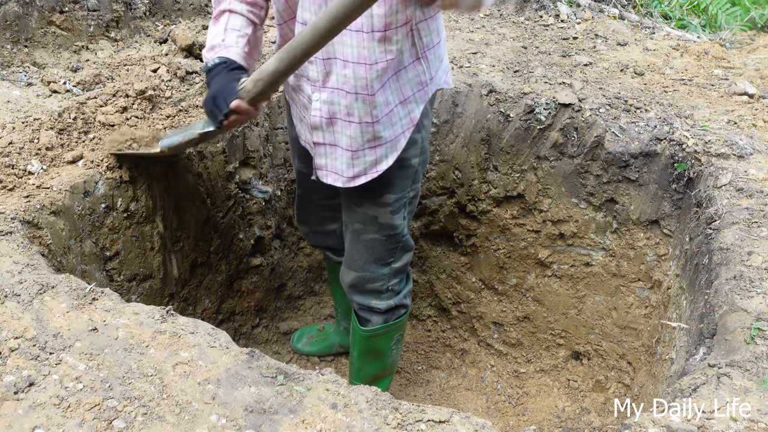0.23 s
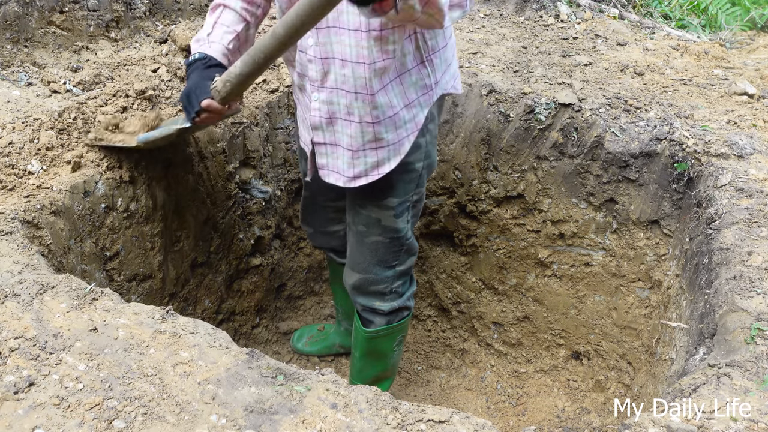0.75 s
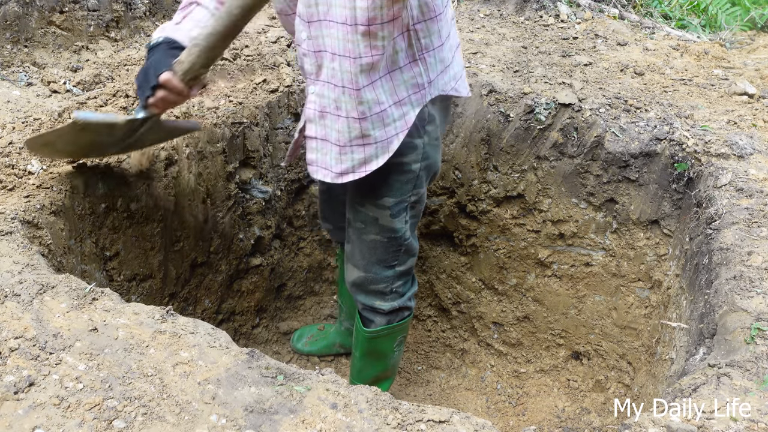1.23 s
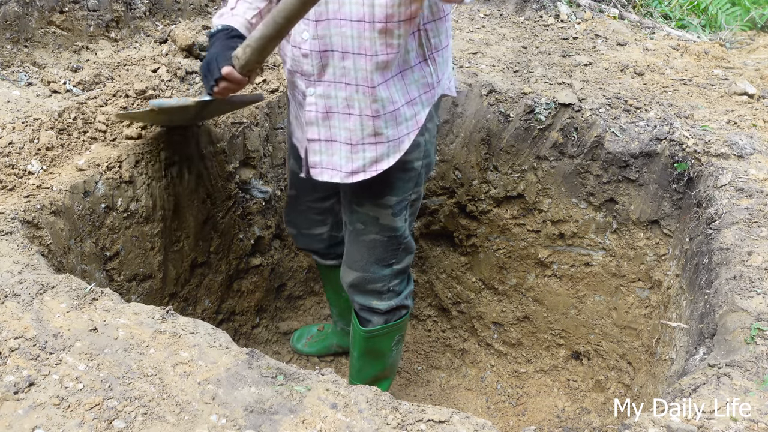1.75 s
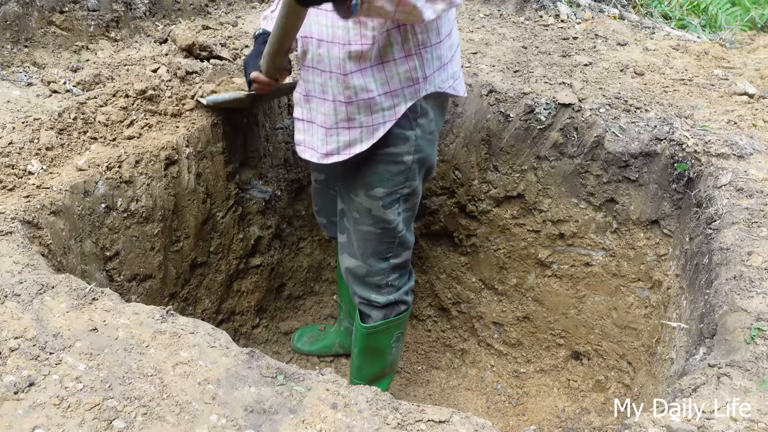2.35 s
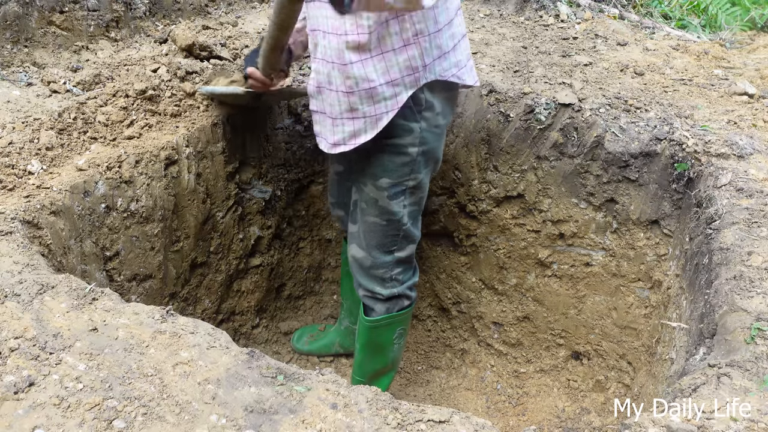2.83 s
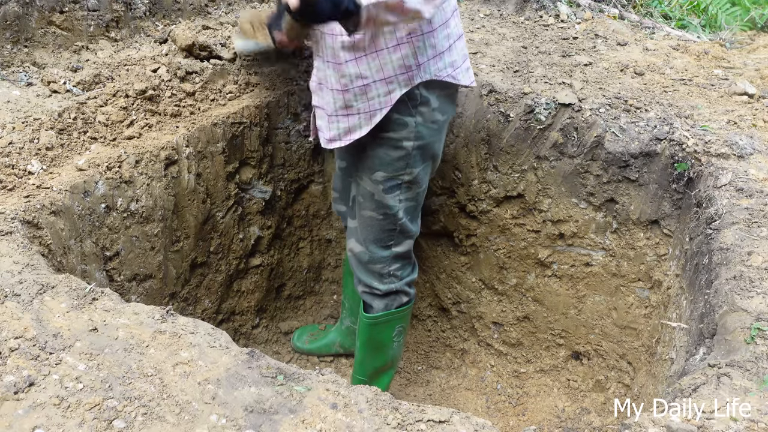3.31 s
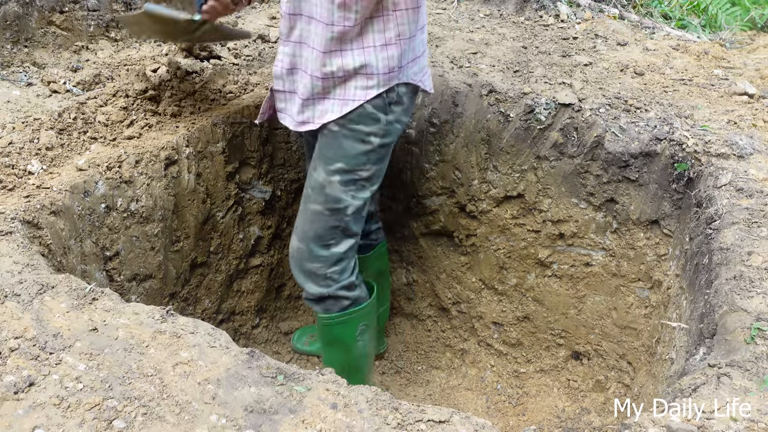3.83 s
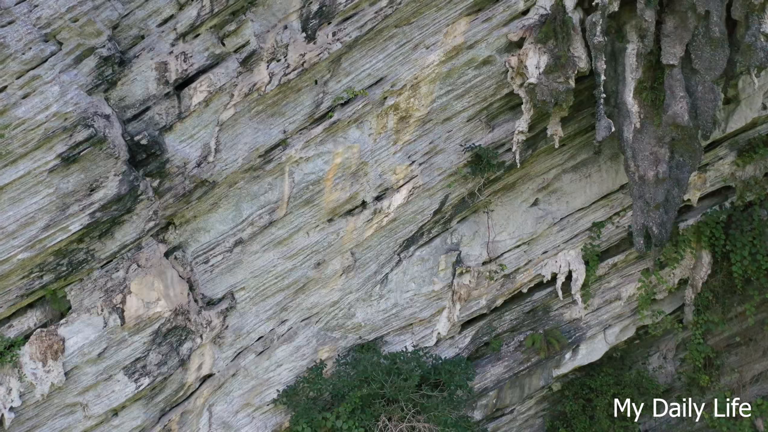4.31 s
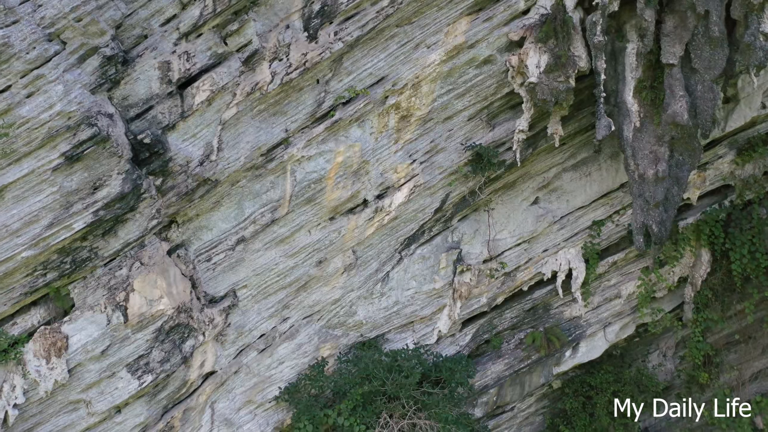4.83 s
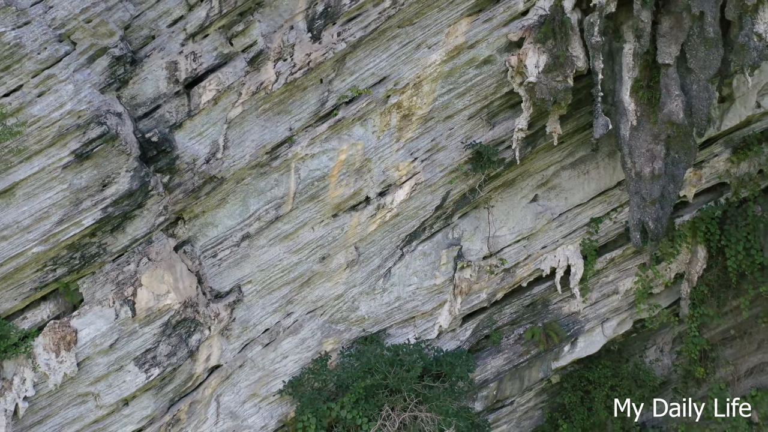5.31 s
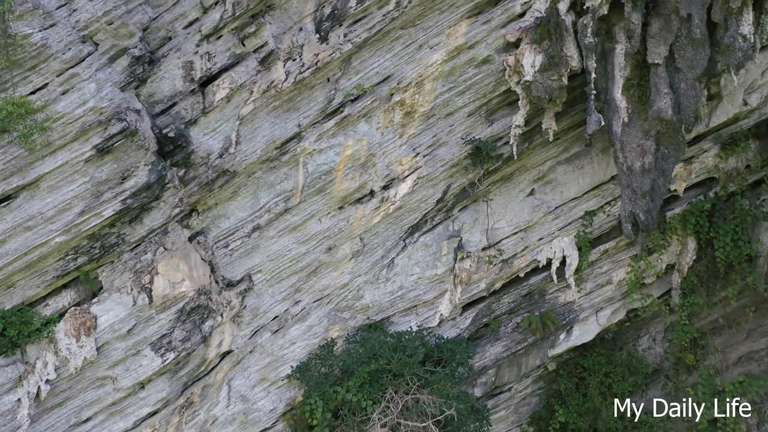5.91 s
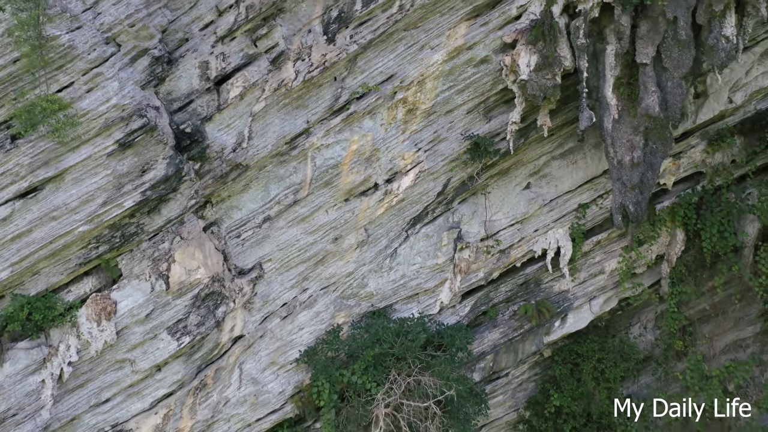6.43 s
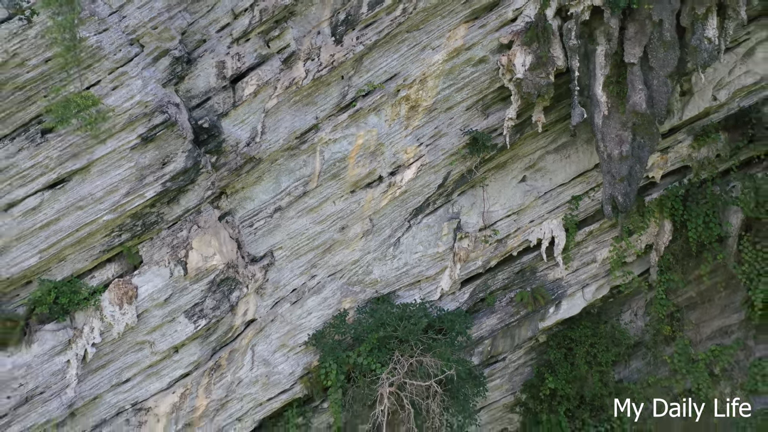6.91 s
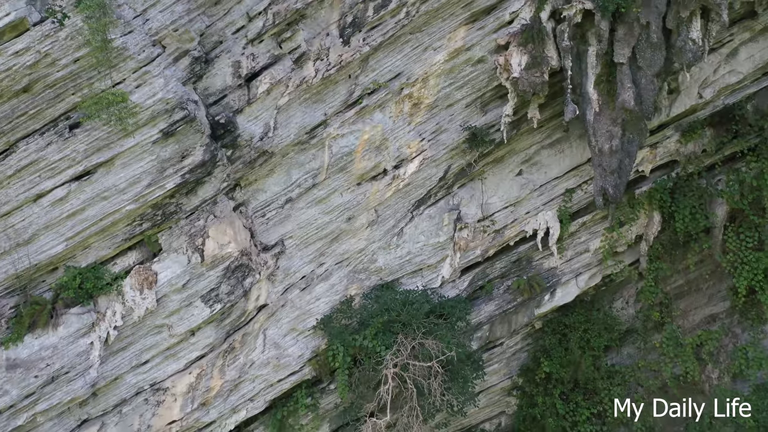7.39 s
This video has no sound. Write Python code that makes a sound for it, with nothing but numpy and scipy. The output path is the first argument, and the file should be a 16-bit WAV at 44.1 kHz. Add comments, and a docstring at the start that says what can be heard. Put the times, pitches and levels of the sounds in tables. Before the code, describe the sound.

Crunchy shovel strokes shave a clay pit under a high cicada buzz; suddenly the digging gives way to layered insect trills and distant bird chirps.

```python
"""First a steel shovel shaves the wall of a clay pit in five strokes, while cicadas drone all around:
random cracks of grit sound directly and ring the blade, filtered noise bursts make thuds and falling clods.
At about 4 s the scene changes abruptly to the foot of a wooded cliff. Several insects pulse there, each with
its own pitch and rate, made of short gliding tones. A far bird gives falling whistles, then rising chirps,
and just before the end the nearest cicada stops."""
import sys
import numpy as np
from scipy import signal
from scipy.fft import rfft, irfft
from scipy.io import wavfile

SR = 44100
rng = np.random.default_rng(int(sys.argv[2]) if len(sys.argv) > 2 else 0)


def wav_out(sig):
    """Save sig, one row per channel (or a flat mono array), as 16-bit PCM at SR to the path in sys.argv[1]."""
    wavfile.write(sys.argv[1], SR, np.round(np.clip(np.atleast_2d(sig).T, -1, 1) * 32767).astype(np.int16))


N = 337806
T = np.arange(N) / SR   # time [s]


def from_db(db):
    """Turns decibels into a gain."""
    return 10 ** (np.asarray(db) / 20)


def rms_one(x):
    """Scales a sound to a power of one."""
    return x / np.sqrt(np.mean(x ** 2) + 1e-20)


def drift(rate):
    """Random wandering: straight lines between chance values of spread 1, `rate` of them a second."""
    knots = rng.standard_normal(20000)
    return np.interp(T * rate, np.arange(len(knots)), knots)


def pan(left_db):
    """Gains for left and right; left is louder by left_db."""
    return from_db([[left_db / 2], [-left_db / 2]])


def band(x, low_hz, high_hz, order=2):
    """Lets one band of pitches through; white noise keeps about its power."""
    sos = signal.butter(order, [low_hz, high_hz], "band", fs=SR, output="sos")
    return signal.sosfilt(sos, x) * np.sqrt(SR / 2 / (high_hz - low_hz))


def colour(x, spectrum, size=4096):
    """Filters to a given spectrum without sounding early (minimum phase); white noise keeps its power."""
    hz, db = np.transpose(spectrum)
    bin_hz = np.fft.rfftfreq(size, 1 / SR)
    gain = rms_one(from_db(np.interp(np.log(bin_hz + 1), np.log(hz), db)))
    # folding the cepstrum forward in time gives the minimum-phase response
    cepstrum = irfft(np.log(gain))
    cepstrum[1:size // 2] *= 2
    cepstrum[size // 2 + 1:] = 0
    response = irfft(np.exp(rfft(cepstrum)))
    return signal.oaconvolve(np.atleast_2d(x), response[None], axes=1)[:, :N]


def stereo_noise(side_db):
    """White noise in two channels; the higher side_db, the more they differ."""
    mid, side = rng.standard_normal((2, N))
    return rms_one(mid + from_db(side_db) * side * [[1], [-1]])


def scatter(x, t60, wet_db, side_db):
    """Adds a dense dying echo from earth, rock or trees; it falls 60 dB in t60 seconds."""
    age = T[:SR // 2]
    tail = stereo_noise(side_db)[:, :len(age)] * from_db(-60 * age / t60)
    tail *= age > .002   # the echo starts after 2 ms
    tail /= np.sqrt(np.sum(tail ** 2) / 2)
    both_channels = np.atleast_2d(x) * np.ones((2, 1))
    return x + from_db(wet_db) * signal.oaconvolve(both_channels, tail, axes=1)[:, :N]


def grains(per_s, spread_db):
    """Random tiny cracks of very uneven size, with a power of one."""
    sizes = from_db(spread_db * np.minimum(rng.exponential(1, N), 4)) * rng.choice([-1, 1], N)
    return rms_one(sizes * (rng.random(N) < per_s / SR))


def dying(start, decay, rise):
    """Loudness curve of one blow: a quick rise, then a slower decay."""
    age = np.maximum(T - start, 0)
    return (1 - np.exp(-age / rise)) * np.exp(-np.minimum(age / decay, 40))


def held(start, length, attack, release):
    """Loudness curve that swells up to its start, holds and dies away."""
    before = np.maximum(start - T, 0) / attack
    after = np.maximum(T - start - length, 0) / release
    return np.exp(-np.minimum(before + after, 40))


def chirps(cycles, hz, duty, sweep_hz, arch_hz, rough_hz):
    """One whistled pulse a cycle, centred on whole cycles; its pitch slides, arches and roughens."""
    place = np.clip(((cycles + .5) % 1 - .5) / duty, -.5, .5)   # -0.5 to 0.5 along the pulse
    pitch = hz + sweep_hz * place - arch_hz * (2 * place) ** 2 + rough_hz * drift(1500)
    return np.sqrt(2) * np.cos(np.pi * place) * np.sin(2 * np.pi * np.cumsum(pitch) / SR)


def whistles(calls, length, from_hz, to_hz, waver_hz):
    """One gliding, wavering note, repeated at each call."""
    song, waver = np.zeros(N), waver_hz * drift(500)
    for start, db in calls:
        done = np.clip((T - start) / length, 0, 1)
        pitch = from_hz + (to_hz - from_hz) * done + waver
        song += from_db(db) * np.sin(np.pi * done) * np.sin(2 * np.pi * np.cumsum(pitch) / SR)
    return song


def open_air(spectrum, side_db, apart_hz, top_side_db):
    """Diffuse background noise; the two channels grow more alike toward the treble."""
    mid, side = rng.standard_normal((2, N))
    low_side = signal.sosfilt(signal.butter(1, apart_hz, fs=SR, output="sos"), side)
    difference = from_db(side_db) * low_side + from_db(top_side_db) * side
    return colour(mid + difference * [[1], [-1]], spectrum)


def chorus(rows, side_db, flutter_db):
    """Many far insects merge into fluttering bands of noise."""
    out = np.zeros((2, N))
    for hz, width, db in rows:
        noise = band(stereo_noise(side_db), hz - width / 2, hz + width / 2, order=3)
        out += from_db(db + flutter_db * drift(120)) * noise
    return out


# spectrum of the air at the cliff: (frequency [Hz], relative level per Hz [dB])
CLIFF_AIR = [(25, -39), (55, -35), (110, -5), (220, 1), (550, -0.5), (900, -6.5), (1900, -4), (2700, -9),
             (5000, -8), (9500, -3), (11500, -15.5), (15500, -15)]
# far insects at the cliff, too many to tell apart: (centre [Hz], width [Hz], level [dB])
CLIFF_CHORUS = [(4160, 710, -63), (4930, 850, -60), (5460, 570, -56), (7020, 680, -51), (7590, 400, -53),
                (9020, 780, -65)]


def cliff_surroundings(air_db=-56.5):
    """Soft noise of the air under a far insect chorus, both shaped from random noise."""
    air = from_db(air_db) * open_air(CLIFF_AIR, side_db=-7.0, apart_hz=1800, top_side_db=-17.0)
    return air * pan(1.1) + chorus(CLIFF_CHORUS, side_db=-7.5, flutter_db=2.0)


# spectrum of the hiss round the pit: (frequency [Hz], relative level per Hz [dB])
PIT_AIR = [(25, -32), (55, -30), (110, -10), (260, -8), (900, -13), (1800, -7), (2300, -3), (3900, 1.5),
           (5300, 2), (6400, -0.5), (9200, -7.5), (12000, -17), (15500, -15)]
# far cicadas round the pit, before panning: (centre [Hz], width [Hz], level [dB])
PIT_CHORUS = [(7325, 730, -39), (8000, 620, -45.5)]
PIT_HISS_DB, PIT_FADE_DB_PER_S = -38.5, 0.64   # the broad hiss slowly sinks


def pit_surroundings(buzz_db=-40.0, upper_db=-42.0):
    """Cicadas buzz in fast falling pulses over their far chorus and a broad hiss."""
    air = open_air(PIT_AIR, side_db=-13.5, apart_hz=1160, top_side_db=-9.0)
    air *= from_db(PIT_HISS_DB - PIT_FADE_DB_PER_S * T)
    # about 61 and 53 pulses a second, slightly uneven
    buzz = from_db(buzz_db) * chirps(
        61 * T + 0.26 * drift(12), hz=7280, duty=0.63, sweep_hz=-400, arch_hz=101.4, rough_hz=150)
    upper = from_db(upper_db) * chirps(
        53 * T + 0.17 * drift(6.5), hz=8444, duty=.65, sweep_hz=-600, arch_hz=103.7, rough_hz=71.6)
    near = scatter(buzz + upper, t60=0.17, wet_db=-3.5, side_db=-6.0)
    far = chorus(PIT_CHORUS, side_db=-8.5, flutter_db=1.0)
    return air + (near + far) * pan(-5.5)


# thin fluttering tones in the hiss round the pit: (start [s], end [s], pitch [Hz], level [dB])
THIN_TONES = [(0.0, 1.5, 3648, -50), (0.9, 1.2, 5525, -50), (2.2, 3.75, 5015, -51), (2.2, 2.75, 5285, -49),
              (1.8, 4.1, 2875, -57), (2.6, 4.1, 3885, -56)]


def thin_tones():
    """Narrow, fluttering tones, each made from a sliver of noise."""
    out = np.zeros(N)
    width_hz, fade_s = 22, .12
    for start, end, hz, db in THIN_TONES:
        fade = np.clip(np.minimum(T - start, end - T) / fade_s, 0, 1)
        tone = band(rng.standard_normal(N), hz - width_hz / 2, hz + width_hz / 2, order=1)
        out += fade * from_db(db) * tone
    return out


# far bird, falling whistles: (time [s], level [dB])
FALLING_CALLS = [(4.056, -55), (5.396, -53), (5.575, -54)]
# far bird, a run of rough rising chirps: (time [s], level [dB])
RISING_CALLS = [(6.37, -56), (6.688, -53), (6.92, -54), (7.135, -53.5), (7.332, -53), (7.529, -53)]


def bird():
    """Short falling whistles, later a run of rough rising chirps, blurred by the cliff's echo."""
    falling = whistles(FALLING_CALLS, length=0.089, from_hz=3400, to_hz=3160, waver_hz=80)
    rising = whistles(RISING_CALLS, length=0.085, from_hz=4530, to_hz=4800, waver_hz=130)
    far_falling = scatter(falling, t60=0.97, wet_db=-0.5, side_db=-9.0)
    return far_falling + scatter(rising, t60=0.5, wet_db=-1.0, side_db=-9.0)


# low rasping insect, two bouts with a short rest: (start [s], end [s], phrases per second once warm [1/s])
RASP_BOUTS = [(3.005, 4.59, 22.32), (4.79, 7.8, 23.03)]
RASP_DB, RASP_HZ = -50, 4190   # once warm, before the accents
# each bout starts this much softer, slower [phrases/s] and lower
WARM_UP_S, COLD_DB, COLD_PER_S, COLD_HZ = .4, 8.5, 10, 199
CRICKET_THROB_HZ, CRICKET_PEAK_S = 7.49, 6.338   # throbs per second, and the time of one peak


def cliff_insects(accent_db=14.5, throb_db=4.0, cricket_peak_db=-50.5, tick_db=-58.5):
    """A rasp in phrases of three pulses, a throbbing cricket trill and a thin high ticking."""
    singing, cold, phrase = np.zeros((3, N))
    for start, end, per_s in RASP_BOUTS:
        bout = (T > start) & (T < end)
        singing += bout
        cold += bout * np.exp(-np.abs(T - start) / WARM_UP_S)
        phrase += bout * np.cumsum(bout * (per_s - COLD_PER_S * cold)) / SR
    accent = accent_db * (np.cos(2 * np.pi * phrase - 1) - 1)   # two strong pulses, then a weak one
    rasp_level = singing * from_db(RASP_DB - COLD_DB * cold + accent)
    rasp = rasp_level * chirps(
        3 * phrase, hz=RASP_HZ - COLD_HZ * cold, duty=0.76, sweep_hz=-480, arch_hz=26, rough_hz=49.7)

    throb = 2 * np.pi * CRICKET_THROB_HZ * (T - CRICKET_PEAK_S)
    trill_hz = 5480 + 110 * np.sin(throb)
    trill = chirps(
        92 * T + 0.753 * drift(15), hz=trill_hz, duty=0.7, sweep_hz=-200, arch_hz=30.0, rough_hz=98)
    cricket = from_db(cricket_peak_db + throb_db * (np.cos(throb) - 1)) * trill

    tick = from_db(tick_db) * chirps(65 * T, hz=9150, duty=0.5, sweep_hz=-500, arch_hz=50, rough_hz=304)
    insects = rasp * pan(16.0) + cricket * pan(4.9) + tick
    return scatter(insects, t60=0.27, wet_db=-5.0, side_db=3.0)


SOLO_DB, SOLO_END_S, SOLO_FADE_S = -40.5, 7.31, .04   # it sings evenly, then stops


def solo_cicada(wander_db=1.5):
    """The nearest cicada: evenly spaced pulses whose pitch rises and falls."""
    cycles = (T - 4.1046) / .044064   # one pulse every 44 ms
    level = from_db(SOLO_DB + wander_db * drift(4)) * np.clip((SOLO_END_S - T) / SOLO_FADE_S, 0, 1)
    song = level * chirps(cycles, hz=7262, duty=.48, sweep_hz=-40, arch_hz=488, rough_hz=46.1)
    return scatter(song, t60=.15, wet_db=-10.0, side_db=-5.0) * pan(-5.5)


# loosened soil trickles down after a stroke: (time of most flow [s], relative level [dB], half length [s])
SPILLS = [(0.518, -35.5, 0.034), (1.074, -41, 0.066), (1.776, -38.5, 0.071), (2.522, -41.5, 0.1)]
# spectra of cracking grit, clay crumbs and fine sand: (frequency [Hz], relative level per Hz [dB])
GRIT = [(200, -37), (700, -18.5), (1400, -7.5), (2200, -0.5), (3200, 5.5), (4500, 2.5), (6500, -1.5),
        (9000, -15), (12000, -21), (16000, -41)]
CRUMBS = [(60, -25), (170, -11.5), (260, -8.5), (380, -9), (700, 0), (1150, 4), (1800, 4), (3000, 2),
          (8000, -26.5)]
SAND = [(3000, -43), (6000, 1), (8500, 6.5), (10500, 3), (13000, -5.5), (16000, -12)]
SPILL_CLAY_DB, SPILL_SAND_DB = -11.5, -8   # crumbs and sand compared with the grit


def spills():
    """Loose grit, crumbs and sand run down the wall, clear of the blade, as showers of tiny cracks."""
    flow = np.zeros(N)
    for s, db, half in SPILLS:
        flow += from_db(db) * np.exp(-np.minimum(((T - s) / half) ** 2 / 2, 40))
    fall = flow * grains(6000, 2.4)
    sand = flow * grains(8000, 2.2)
    crumbs = from_db(SPILL_CLAY_DB) * colour(fall, CRUMBS)
    return colour(fall, GRIT) + crumbs + from_db(SPILL_SAND_DB) * colour(sand, SAND)


# the blade is pushed through the clay, a few shoves to a stroke; also played by shovel():
# (time [s], length [s], relative grit level [dB], relative crumbling level [dB], relative thud level [dB])
SHOVES = [(0.302, 0.023, -22, -50, -29.5), (0.34, 0.038, -27.5, -38, -31.5), (0.395, 0.016, -28, -36, -46),
          (0.738, 0.027, -25, -37, -37.5), (0.789, 0.04, -22, -27.5, -29.5),
          (0.878, 0.018, -24.5, -35.5, -50), (0.937, .004, -42.5, -36, -51),
          (1.369, 0.022, -28, -31, -34.5), (1.435, 0.022, -22.5, -26, -38), (1.482, .02, -22, -34, -38),
          (1.566, 0.051, -20, -26, -33.5), (2.134, 0.0089, -28.5, -50, -53), (2.162, 0.023, -15, -29, -29),
          (2.226, 0.056, -32.5, -49, -52), (2.291, 0.023, -22, -29.5, -32.5),
          (2.361, 0.04, -31, -44.5, -51), (2.695, 0.012, -34, -40, -56), (2.83, 0.047, -29, -34.5, -50),
          (2.929, 0.024, -25.5, -36, -35.5), (2.991, .005, -33, -38, -48), (3.143, 0.038, -29, -38, -50),
          (3.219, 0.0072, -46, -28.5, -47), (3.284, 0.0022, -45, -35.5, -54)]
# clods land and boots shift: (time [s], relative level [dB], decay [s], highest pitch [Hz])
CLODS = [(2.567, -30, 0.0091, 684), (2.644, -37, 0.012, 640), (3.234, -26, .005, 1150),
         (3.851, -53.5, .06, 1000)]
# spectrum of dull blows on soft earth: (frequency [Hz], relative level per Hz [dB])
EARTH = [(25, -27), (52, -49), (72, -2.5), (110, -10.5), (185, -13), (225, 1), (295, 1), (350, -3),
         (650, 1.5), (1500, -1), (4000, -42)]
THUD_DECAY_S, THUD_HZ = 0.02, 348   # decay and highest pitch of a shove's dull blow
THUD_SPAN, CLOD_SPAN = 6.5, 2.36    # highest over lowest pitch of a blow


def thuds(level_db=3.5):
    """Soft earth takes a shove with a deep, broad burst and a clod with a higher, narrower knock."""
    push, blows = rng.standard_normal(N), np.zeros(N)
    shoves = [(s, db, THUD_DECAY_S, THUD_HZ, THUD_SPAN) for s, _, _, _, db in SHOVES]
    clods = [(*row, CLOD_SPAN) for row in CLODS]
    for s, db, decay, hz, span in shoves + clods:
        contact = signal.butter(3, [hz / span, hz], "band", fs=SR, output="sos")
        burst = push * dying(s, decay, rise=0.00043) + 1e-18   # the tiny offset keeps the filter fast
        blows += from_db(db + level_db) * signal.sosfilt(contact, burst)
    return colour(blows, EARTH)


# ringing notes of the steel blade: (pitch [Hz], relative level [dB], time to fall 60 dB if undamped [s])
BLADE = [(907, -6.5, 0.14), (1105, -6.5, 0.12), (1335.5, 1, 0.2), (1437, -2, 0.34), (1760, -1.5, 0.058),
         (1934, -0.5, 0.078), (2134, 4, 0.089), (2240, -1, 0.049), (2606, 2.5, 0.084), (2660, -1, 0.22),
         (3140, 6, 0.1), (3430, 0, 0.24), (3913, 4.5, 0.1), (3990, 4.5, 0.05), (4450, 0, .18),
         (4975, 5, 0.13), (5580, -6.5, 0.084), (6330, -2, 0.11), (7920, -10, 0.36)]
LONGEST_RING_S = .15   # clay pressed against the steel damps longer ringing


def blade(force, vary_db=4.5):
    """The blade's modes; each takes more or less of the force as the contact point wanders."""
    out = np.zeros(N)
    for k, (hz, db, t60) in enumerate(BLADE):
        t60 = min(t60, LONGEST_RING_S)
        r = np.exp(-np.log(1000) / (t60 * SR))   # what is left of the swing after one sample
        w = 2 * np.pi * hz / SR
        gain = from_db(db) * np.sqrt(2 * (1 - r * r)) * np.sin(w) * (-1) ** k
        drive = force * from_db(vary_db * drift(12)) + 1e-18
        out += signal.lfilter([0, gain], [1, -2 * r * np.cos(w), r * r], drive)
    return out


# the edge bites or hits a stone: (time [s], relative level [dB], sandy top compared with the bite [dB])
BITES = [(0.300, -10.5, -7), (0.318, -21, -12), (0.34, -14, -4), (0.368, -25, -11), (0.783, -14.5, -19),
         (0.806, -16.5, -9), (0.83, -21, -16), (1.364, -20, -0.5), (1.395, -21, -1), (1.426, -12, -2),
         (1.437, -16, -19), (1.524, -17, 1), (1.547, -17, 4), (1.561, -18, 1), (1.57, -11.5, -4),
         (1.598, -17.5, -9), (1.617, -18.5, -10), (1.813, -35, 4), (2.06, -31, 0), (2.126, -22.5, 6),
         (2.136, -15.5, 2.5), (2.162, -17, -12), (2.187, -16.5, -5), (2.2255, -14, -8), (2.29, -23, -2),
         (2.693, -26, -3), (2.768, -22, 4.5), (2.797, -25, 3), (2.831, -18.5, 1.5), (2.868, -28, -5),
         (2.928, -12.5, -7), (2.953, -19, -7), (3.074, -29, -10), (3.221, -22, -4), (3.287, -24.5, -8),
         (3.866, -46, 6)]
# a pebble flicks the blade, and one mode stands out: (time [s], pitch [Hz], level [dB], decay [s])
PINGS = [(0.346, 1430, -22, 0.027), (1.812, 2160, -36, 0.028), (3.29, 1425, -29, 0.015)]
SHOVE_ATTACK_S, SHOVE_RELEASE_S = 0.016, 0.025   # the grit starts to rub, and runs out
CLAY_ATTACK_S, CLAY_RELEASE_S = 0.0043, .02      # the clay gives way, and stops crumbling
SAND_ATTACK_S, SAND_RELEASE_S = 0.016, 0.022     # fine sand hisses before the edge is fully in
BITE_DECAY_S = 0.007       # for a bite whose sandy top is 0 dB
HARD_BITE_SHORTENS = 0.2   # the brighter a bite, the sooner it is over [dB of decay per dB of top]


def shovel(grit_db=-4.5, crumb_db=-2.0, sand_db=-6.0, bite_db=0.0, snap_db=6.5, bite_crumb_db=-22.5,
           ring_db=-19.5, crumb_ring_db=-8, judder_db=3.0):
    """Sliding and biting break grit; the cracks sound directly and shake the blade."""
    grit, crumbs, sand, bites, bite_sand, snaps = np.zeros((6, N))
    for s, length, rub_db, clay_db, _ in SHOVES:
        grit += from_db(rub_db + grit_db) * held(s, length, SHOVE_ATTACK_S, SHOVE_RELEASE_S)
        sand += from_db(rub_db + sand_db) * held(s, length, SAND_ATTACK_S, SAND_RELEASE_S)
        crumbs += from_db(clay_db + crumb_db) * held(s, length, CLAY_ATTACK_S, CLAY_RELEASE_S)
    for s, db, top_db in BITES:
        decay = BITE_DECAY_S * from_db(-HARD_BITE_SHORTENS * top_db)
        bites += from_db(db + bite_db) * dying(s, decay, rise=.0001)
        bite_sand += from_db(db + bite_db + top_db) * dying(s, decay, rise=0.0011)
        snaps[round(s * SR)] = from_db(db + snap_db)   # the first contact is one sharp crack

    judder = from_db(judder_db * drift(130))   # the edge sticks and slips
    cracks = bites * grains(14000, 2.8) + snaps
    force = grit * judder * grains(2000, 3.7) + cracks
    crumbling = crumbs * judder * grains(1200, 2.0) + from_db(bite_crumb_db) * cracks
    hiss = sand * judder * grains(6000, 3.5) + bite_sand * grains(14000, 1.9)
    ringing = from_db(ring_db) * blade(force + from_db(crumb_ring_db) * crumbling)
    pings = np.zeros(N)
    for s, hz, db, decay in PINGS:
        pings += from_db(db) * dying(s, decay, rise=0.00042) * np.sin(2 * np.pi * hz * (T - s))
    direct = colour(force, GRIT) + colour(crumbling, CRUMBS) + colour(hiss, SAND)
    return direct + ringing + pings


SCENE_CHANGE_S = 4.066


def scene(scrape_low_hz=90):
    """The pit first, then the cliff."""
    high_pass = signal.butter(2, scrape_low_hz, "high", fs=SR, output="sos")
    scraping = signal.sosfilt(high_pass, shovel() + spills())
    digging = scatter(scraping, t60=0.045, wet_db=-13.0, side_db=-14.5)
    digging = digging + scatter(thuds(), t60=0.13, wet_db=-7.5, side_db=-11.0)
    pit = pit_surroundings() + thin_tones() + digging
    cliff = cliff_surroundings() + bird() + cliff_insects() + solo_cicada()
    return np.where(T < SCENE_CHANGE_S, pit, cliff)


CUTOFF_HZ = 15900


def record(dry, top=0.82):
    """The highest peaks are rounded and the treble is cut steeply."""
    rounded = top * np.tanh(dry / top)
    low_pass = signal.ellip(12, .2, 80, CUTOFF_HZ, fs=SR, output="sos")
    return signal.sosfilt(low_pass, rounded)


dry = scene()
out = record(dry)
wav_out(out)
```